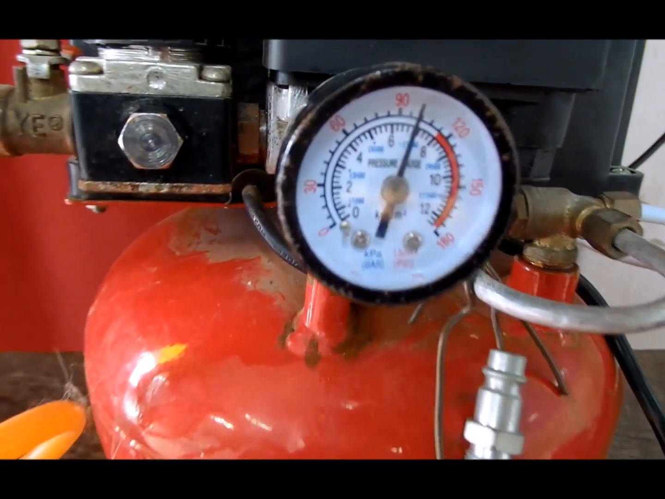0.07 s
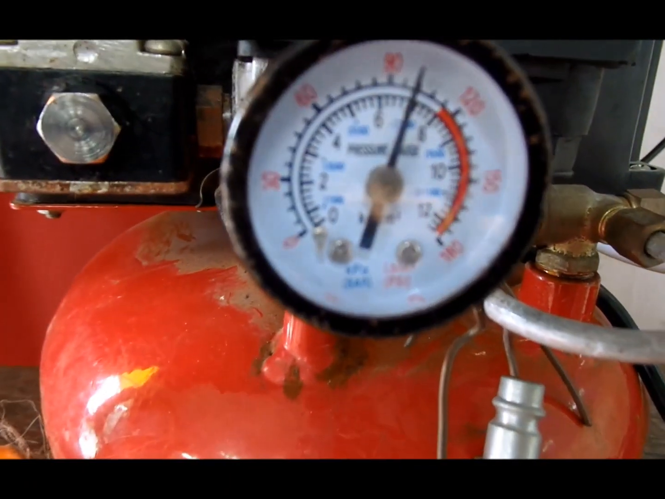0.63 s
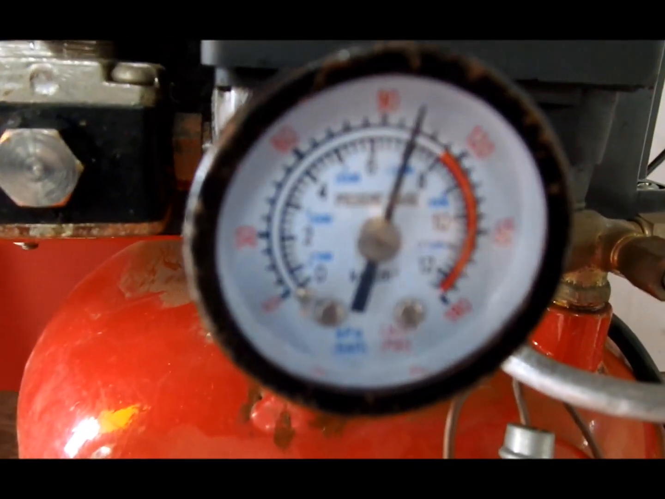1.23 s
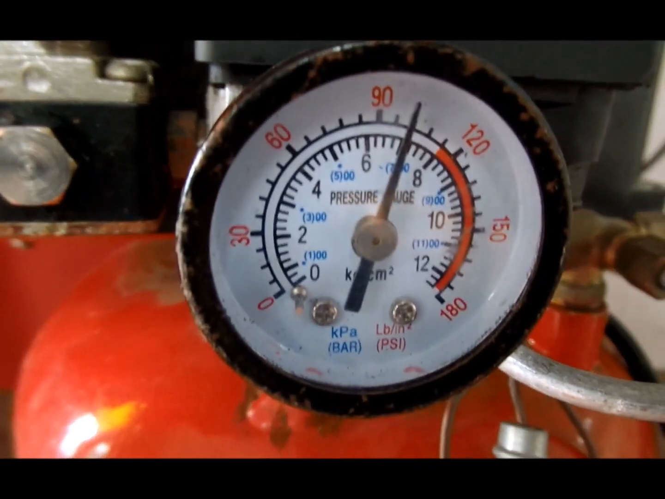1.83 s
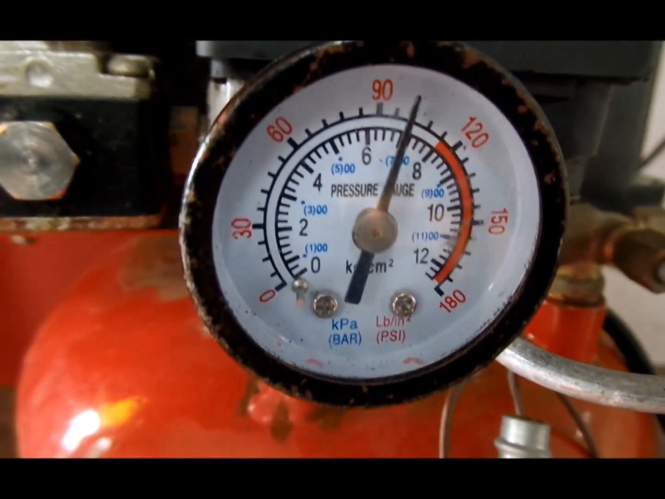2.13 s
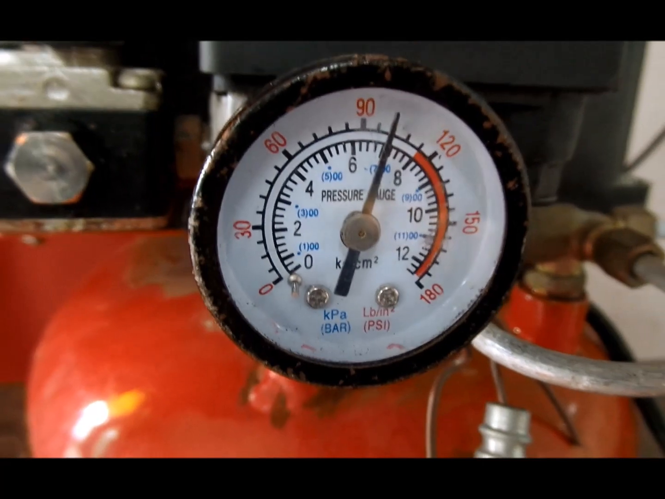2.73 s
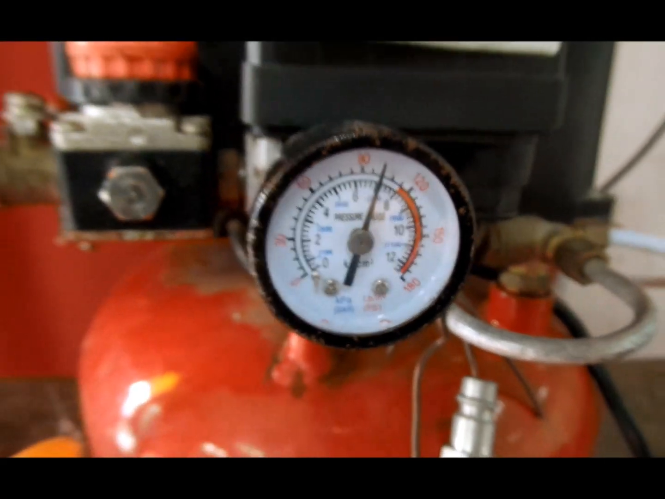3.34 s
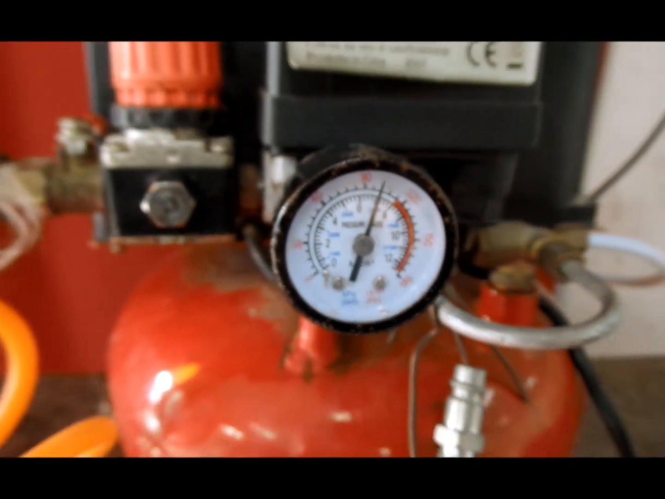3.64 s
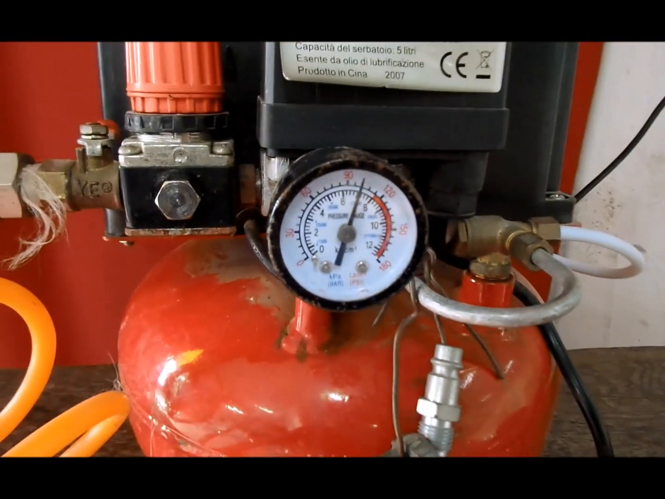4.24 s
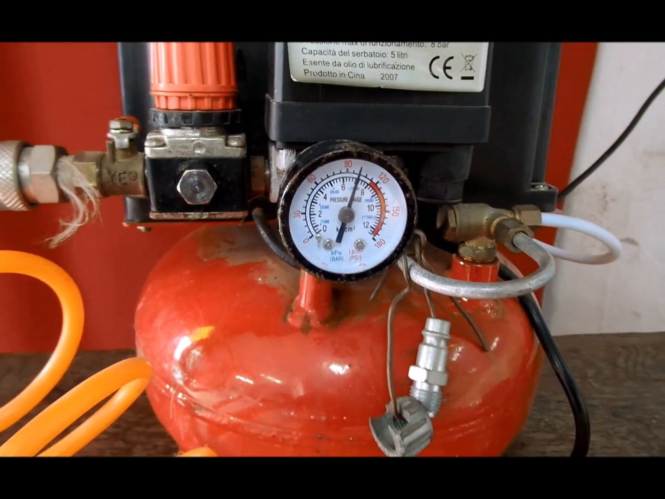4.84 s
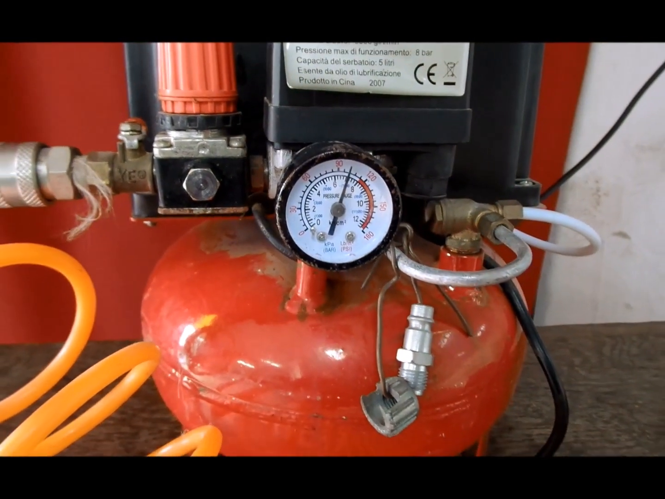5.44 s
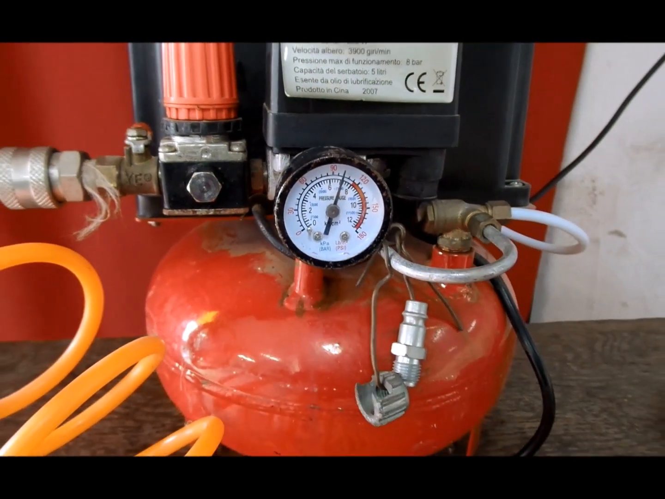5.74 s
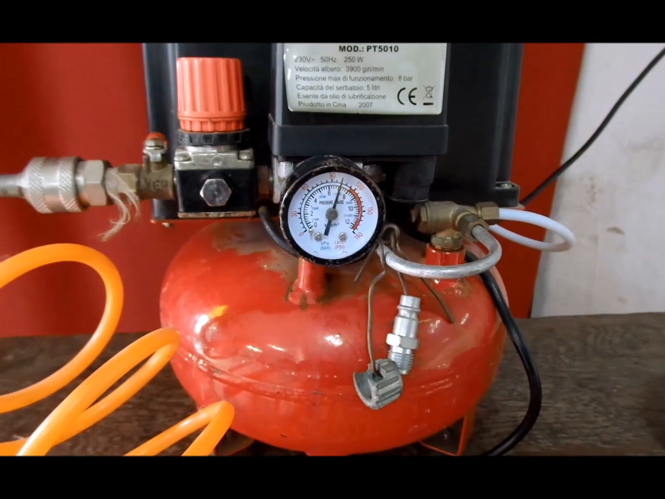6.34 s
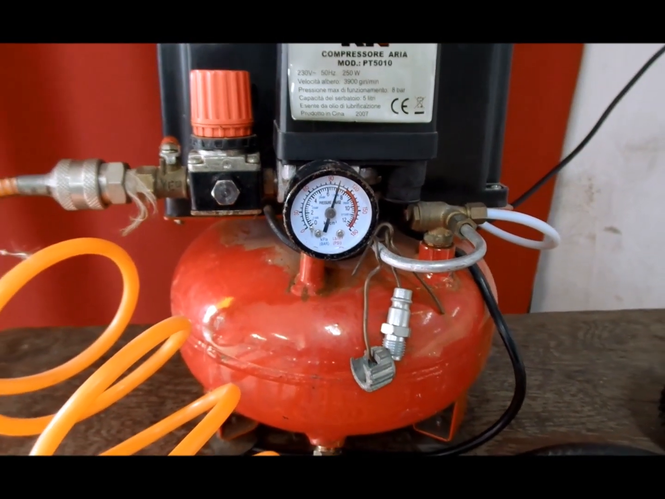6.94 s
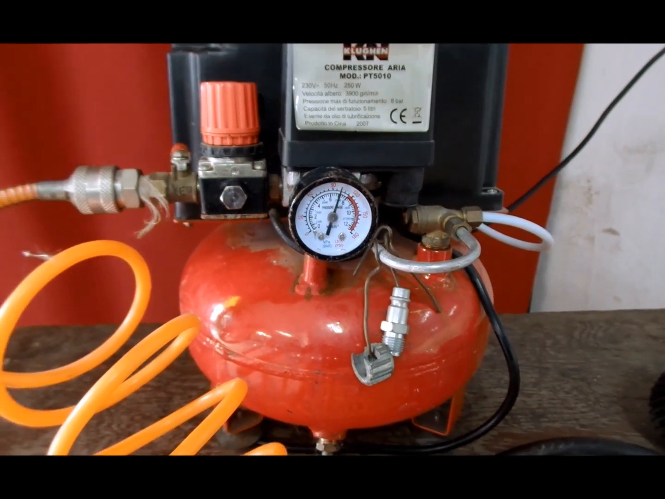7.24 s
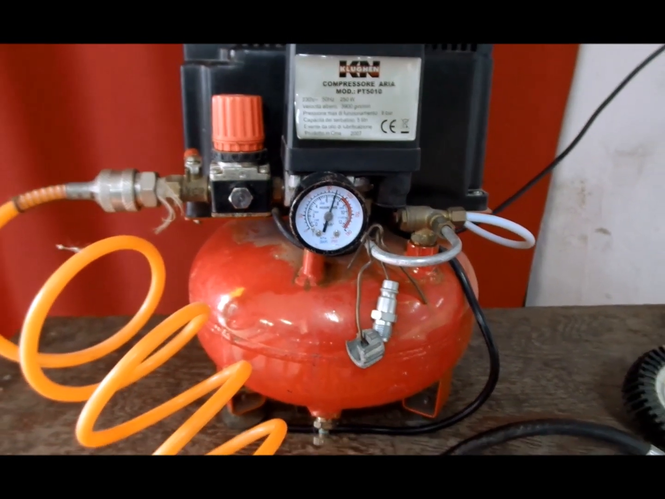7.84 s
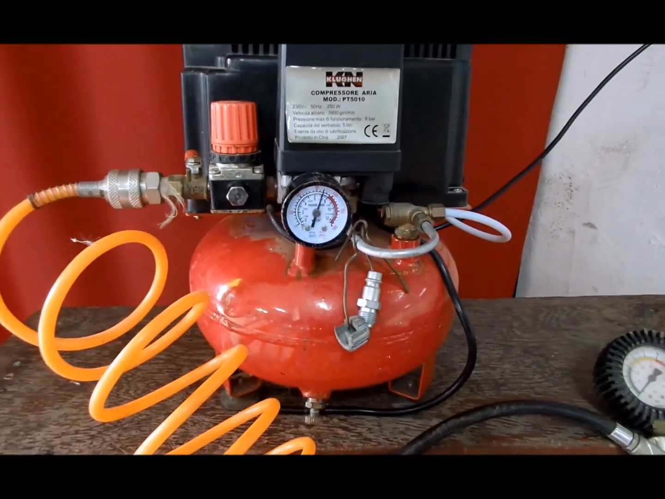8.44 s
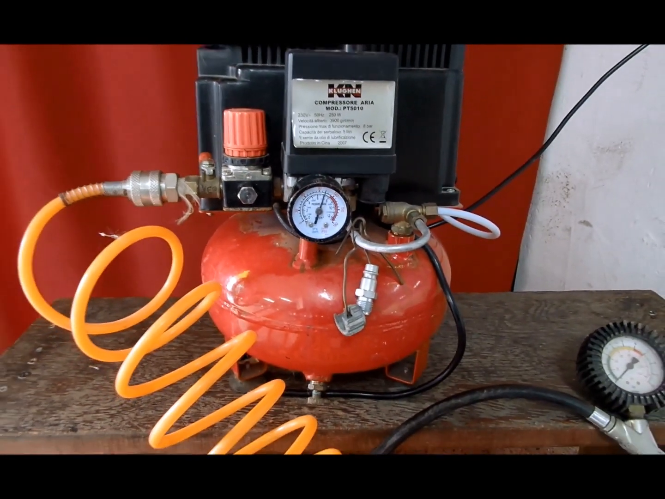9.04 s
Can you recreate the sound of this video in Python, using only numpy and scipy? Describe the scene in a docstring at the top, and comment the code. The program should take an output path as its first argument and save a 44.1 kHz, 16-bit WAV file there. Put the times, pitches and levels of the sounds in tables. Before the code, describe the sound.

A small piston air compressor runs without a break indoors. Its rapid hollow puffs blend into an even motor drone, with a light metallic clatter from the casing. Air rushes and hisses over it, along with a faint high whistle, tiny squeaks and the occasional tick of a loose fitting. The microphone starts close and backs away, so the sound softens a little.

```python
"""A small piston air compressor runs on a workbench indoors, slowing a little as its tank fills.
Each crank turn gives one hollow puff and rings the casing; the mains-fed motor hums and ripples the speed.
Cooling air rushes, the head hisses, the piston seal whistles and squeaks, and a loose fitting ticks.
The microphone starts at the gauge and backs away."""
import sys
import numpy as np
from scipy import signal
from scipy.fft import rfft, irfft
from scipy.io import wavfile
from scipy.ndimage import uniform_filter1d, map_coordinates

SR = 44100
rng = np.random.default_rng(int(sys.argv[2]) if len(sys.argv) > 2 else 0)


def master(y):
    """Save y as 16-bit WAV."""
    cut = np.clip(np.atleast_2d(y).T, -1, 1)
    pcm = np.round(cut * 32767)  # scale
    wavfile.write(sys.argv[1], SR, pcm.astype(np.int16))


N = 405272
TIME = np.arange(N) / SR
CRANK_HZ, SAG_HZ_PER_S = 69.14, .045
MEAN_CRANK_HZ = CRANK_HZ - SAG_HZ_PER_S * TIME.mean()
WHISTLE_HZ = 12680


def amp(db):
    return 10 ** (np.asarray(db) / 20)


def unit_rms(x):
    return x / np.sqrt(np.mean(x ** 2) + 1e-20)


def wander(hz, size=4096):
    """Smooth random motion of rms 1, up to about hz."""
    f = np.fft.rfftfreq(size, TIME[-1] / size)
    slow = irfft(rfft(rng.standard_normal(size)) / (1 + (f / hz) ** 4))
    return unit_rms(np.interp(TIME, np.linspace(0, TIME[-1], size), slow))


# Microphone path: (time [s], distance [0 = near, at the gauge; 1 = far, a step back])
MIC_PATH = [(0, 0.1), (.9, 0.043), (2.5, -0.063), (4, 0.47), (5, 0.57), (6, 0.9), (8, 1.054), (9.19, 1.2)]
def mic_distance(t=TIME):
    return np.interp(t, *np.transpose(MIC_PATH))


def level_at(distance, near_db, far_db, midway_db=0):
    """Levels in dB (moments x frequencies); reflections count most midway."""
    d = distance[:, None]
    return near_db + d * (far_db - near_db) + np.maximum(4 * d * (1 - d), 0) * midway_db


def colour(x, rows, phase=np.zeros_like, size=4096):
    """Filters x along the microphone path by rows of (Hz, near dB, far dB, optional midway dB)."""
    row_hz, *columns = np.transpose(rows)
    overlap = size - size // 4
    hz, t, spectra = signal.stft(x, SR, nperseg=size, noverlap=overlap)
    levels_db = [np.interp(np.log(hz + 1), np.log(row_hz), c) for c in columns]
    gain = amp(level_at(mic_distance(t), *levels_db)) * np.exp(1j * phase(hz))
    return signal.istft(spectra * gain.T, SR, nperseg=size, noverlap=overlap)[1][:N]


def crank(ripple_hz, ripple_turns=.0012, jitter_turns=.0003, start_turns=-.51):
    """Crank angle in turns, slowing under load and shaken by mains torque; puffs fall on whole turns."""
    steady = np.cumsum(CRANK_HZ - SAG_HZ_PER_S * TIME) / SR + start_turns
    return steady + ripple_turns * np.sin(2 * np.pi * ripple_hz * TIME) + jitter_turns * wander(45)


def revolve(orders, turns, size=4096):
    """Plays slowly changing complex amplitudes (moments x crank orders) at the crank angle."""
    cycles = irfft(np.pad(orders, ((0, 0), (1, 0))), size) * size / np.sqrt(2)
    moment = np.linspace(0, len(cycles) - 1, N)
    return map_coordinates(cycles, [moment, turns % 1 * size], order=1, mode="grid-wrap")


PUFF_ORDERS = 13
# Pump spectrum: (frequency [crank orders], near [dB], far [dB], midway reflections [dB])
PUMP_SPECTRUM = [(1, -50, -51.5, 0.0), (2, -50, -55.5, 0.5), (3.04, -44.5, -47, -1), (4, -48.5, -52.0, 0),
                 (5.1, -45, -49.5, 0), (6.05, -36, -36, -0.5), (7.11, -23, -27.5, 1.5),
                 (8.04, -22, -24.5, -2), (9.05, -21.5, -29.5, 1.5), (10.02, -26.5, -29, -2.5),
                 (10.92, -38, -46, 1), (11.8, -33.5, -42, 1), (12.84, -40, -45.5, -1.5),
                 (13.6, -50, -52, 4), (15, -51.5, -50.5, -10.5), (16, -42.5, -47, 0), (17, -39.5, -41, 1.5),
                 (18, -40.5, -64, 4.5), (19, -55.5, -50, 9), (20, -43, -53, -5), (21, -43, -45, -0.5),
                 (22, -41.5, -59, 2.5), (23, -50, -53, 5.5), (24, -46, -55.5, 2.5), (25, -49.5, -64, 6),
                 (26, -65, -61, -12)]
def pump(turns, sweep_turns_per_order=.026, unevenness=.006):
    """One pulse a turn passes the hollow intake and leaves as a puff of rising pitch."""
    pulses = revolve(np.ones((2, PUFF_ORDERS)), turns) * (1 + unevenness * wander(35))
    intake = np.array(PUMP_SPECTRUM) * [MEAN_CRANK_HZ, 1, 1, 1]
    peak_hz = intake[np.argmax(intake[:, 1]), 0]
    return colour(pulses, intake,
                  phase=lambda hz: 1 - np.pi * sweep_turns_per_order * ((hz - peak_hz) / MEAN_CRANK_HZ) ** 2)


# Casing modes: (frequency [Hz], width [Hz], near [dB], far [dB], midway reflections [dB],
# knock angle after the puff [turns])
CASING_MODES = [(1770, 75, -42, -66, 6, 0.057), (2011, 54, -46.5, -50, -6.5, 0.0485),
                (2150, 130, -52, -67, 0, 0.0716), (2488, 115, -48.5, -54, -1.5, 0.0783),
                (2890, 94, -54, -58.5, -0.5, .55), (3203, 85, -51, -55.5, 3, .58),
                (3635, 276, -55, -58.5, 1, .6), (4520, 680, -65.5, -66, 0, .1),
                (5185, 400, -63.5, -67, 0, .15), (5800, 100, -56.5, -61, 2.5, .07),
                (6650, 1400, -65, -67.5, 2.5, .19)]
def clatter(turns, casing_gain_db=.2, standing_db=2, smear_rad=.98, unevenness=.065, count=112):
    """Valves and bearings knock the casing at set crank angles; reflections shift the ring."""
    order = np.arange(1, count + 1)
    valve_orders = len(PUMP_SPECTRUM)
    mode_hz, width_hz, near_db, far_db, midway_db, mode_turns = np.transpose(CASING_MODES)
    detuning = (order * MEAN_CRANK_HZ - mode_hz[:, None]) / width_hz[:, None]
    response = 1 / (1 + 2 * detuning ** 2) ** 2
    loudest_mode = np.argmax(amp(near_db)[:, None] ** 2 * response, axis=0)
    knock_turns = mode_turns[loudest_mode]
    distance = mic_distance(np.linspace(0, TIME[-1], N // 4096))
    node, spacing = rng.random((count, 2)).T
    standing_wave = np.sin(2 * np.pi * (node + np.outer(distance, .5 + spacing)))
    standing_wave *= np.minimum(order / valve_orders, 2)
    ring_db = 10 * np.log10(amp([near_db, far_db]) ** 2 @ response)
    levels_db = level_at(distance, *ring_db, midway_db[loudest_mode])
    levels_db += casing_gain_db + standing_db * standing_wave
    # The pump's upper orders: the intake valve knocks between puffs.
    levels_db[:, :valve_orders] = level_at(distance, *np.transpose(PUMP_SPECTRUM)[1:])
    knock_turns[:valve_orders] = .6
    # Ringing metal smears each knock over much of the turn.
    phase = smear_rad * rng.standard_normal(count) + .5 * standing_wave - 2 * np.pi * order * knock_turns
    knocks = revolve(amp(levels_db) * np.exp(1j * phase) * (order > PUFF_ORDERS), turns)
    return knocks * (1 + unevenness * wander(87))


# Motor hum at the ripple frequency plus 0, 1, 2 crank orders: (level [dB])
HUM_LINES_DB = [-67.5, -68, -72]
def hum(turns, ripple_hz):
    """The motor's iron buzzes at twice the mains frequency, loaded by each stroke."""
    return np.sqrt(2) * sum(amp(db) * np.sin(2 * np.pi * (ripple_hz * TIME + order * turns))
                            for order, db in enumerate(HUM_LINES_DB))


# Cooling air spectrum: (frequency [Hz], near [dB/Hz], far [dB/Hz])
RUSH_SPECTRUM = [(20, -92, -88), (80, -77.5, -87), (332, -80.5, -82.5), (477, -70.5, -72),
                 (563, -65.5, -68), (785, -70.5, -75), (1040, -73.5, -78.5), (1220, -70, -71.5),
                 (1500, -73, -78), (1920, -76.5, -82.5), (2080, -74, -78.5), (2700, -76, -81.5),
                 (3220, -76.5, -79), (3850, -79.5, -83)]
# Head hiss shape: (frequency [Hz], near [relative dB], far [relative dB])
HISS_SHAPE = [(4660, -74.5, -85), (5800, -77.5, -80), (7000, -75, -82.5), (8070, -79.5, -82.5),
              (8300, -72, -78.5), (8500, -82.5, -86), (10000, -81.5, -85), (11000, -82.5, -86.5),
              (11400, -79.5, -81), (13100, -76.5, -82), (14000, -75, -79.5), (14200, -67, -76),
              (15200, -75.5, -77.5)]
def turbulence():
    """Air noise coloured by distance, split into a rush band and a hiss band."""
    noise = colour(rng.standard_normal(N) * np.sqrt(SR / 2), RUSH_SPECTRUM + HISS_SHAPE)
    split_hz = RUSH_SPECTRUM[-1][0]
    low = irfft(rfft(noise) * (np.fft.rfftfreq(N, 1 / SR) < split_hz), N)
    return low, noise - low


def rush(noise, turns, stroke_db=.5, flutter_db=1.23, gain_db=-.1):
    """Cooling air flutters and swells with every stroke."""
    return noise * amp(gain_db + stroke_db * np.cos(2 * np.pi * turns) + flutter_db * wander(25))


# Spells of extra seal leakage: (centre [s], half length [s], hiss rise [dB])
LEAK_SPELLS = [(2.1, 1, 0.7), (3.35, .02, 3), (8.6, 0.96, 1.4)]
def leak_db():
    """Extra flow past the seal swells and fades smoothly."""
    return sum(db * np.exp(-((TIME - centre_s) / half_s) ** 2) for centre_s, half_s, db in LEAK_SPELLS)


def hiss(noise, turns, near_db=-38, recede_db=-1.5, stroke_db=-.2, flutter_db=.96,
         valve_db=3.2, valve_at_turns=.091, valve_width_turns=.041):
    """The head's hiss flutters, and spits as the valve closes just after the puff."""
    steady = noise / np.sqrt(uniform_filter1d(noise ** 2, size=16384))
    from_valve_turns = (turns - valve_at_turns + .5) % 1 - .5
    spit = np.exp(-(from_valve_turns / valve_width_turns) ** 2)
    cycle_db = stroke_db * np.cos(2 * np.pi * turns) + valve_db * spit
    level_db = near_db + recede_db * mic_distance() + leak_db()
    return steady * amp(level_db + cycle_db + flutter_db * wander(45))


def whistle(level_db, width_hz=70, flicker_db=.5):
    """Leaking air excites a narrow resonance at the piston seal."""
    detuning = (np.fft.rfftfreq(N, 1 / SR) - WHISTLE_HZ) / width_hz
    airy = unit_rms(irfft(rfft(rng.standard_normal(N)) / (1 + 2 * detuning ** 2), N))
    return airy * amp(level_db + flicker_db * wander(27))


def random_events(per_s, level_db, spread_db=5.5):
    """Rows of (time [s], level [dB]) at random moments, scattered about a moving level."""
    onsets = np.flatnonzero(rng.random(N) < per_s / SR)
    scattered_db = level_db + spread_db * rng.uniform(-.75, 1, N)
    return [(i / SR, scattered_db[i]) for i in onsets]


def bursts(events, rise_s, decay_s):
    """Envelope that jumps and dies away at each (time [s], level [dB])."""
    onset_s, level_db = np.transpose(events)
    impulses = np.bincount((onset_s * SR).astype(int), amp(level_db), N)
    t = np.arange(SR // 5) / SR
    shape = (1 - np.exp(-t / rise_s)) * np.exp(-t / decay_s)
    return signal.oaconvolve(impulses, shape / shape.max())[:N]


# Clearest seal squeaks: (time [s], level [relative dB])
SEAL_SQUEAKS = [(.1594, -41), (1.5933, -40), (1.7684, -35.5), (7.4979, -41), (8.3409, -37), (8.8064, -35),
                (8.9092, -40)]
def squeaks(whistle_db, random_rise_db=10, gain_db=-3.5):
    """The seal catches now and then in a clean tone at the whistle's pitch."""
    events = SEAL_SQUEAKS + random_events(per_s=3.5, level_db=whistle_db + random_rise_db)
    envelope = bursts(events, rise_s=.005, decay_s=.022)
    return amp(gain_db) * envelope * np.sin(2 * np.pi * WHISTLE_HZ * TIME + wander(40))


def seal(turns, near_db=-53, recede_db=-4.5, db_per_leak_db=3.1, stroke_db=3):
    """Whistle and squeaks pulse with the stroke; leakage lifts the whistle."""
    level_db = near_db + recede_db * mic_distance() + db_per_leak_db * leak_db()
    return (whistle(level_db) + squeaks(level_db)) * amp(stroke_db * np.cos(2 * np.pi * turns))


# Clearest fitting ticks: (time [s], level [dB])
FITTING_TICKS = [(1.5694, -34), (1.5994, -34), (1.9594, -31), (2.4394, -36), (3.3822, -36)]
def ticks(band_hz=(2800, 6000), faint_db=-42, recede_db=-5):
    """A loose fitting, shaken by the pump, taps with a short bright rasp."""
    events = FITTING_TICKS + random_events(per_s=2.5, level_db=faint_db + recede_db * mic_distance())
    bandpass = signal.butter(2, band_hz, "band", fs=SR, output="sos")
    rasp = unit_rms(signal.sosfilt(bandpass, rng.standard_normal(N)))
    return rasp * bursts(events, rise_s=.00088, decay_s=.0047)


def scene(ripple_hz=100, opening_s=.292, opening_db=2.5):
    """One crank drives the compressor; the opening moment is a little louder."""
    turns = crank(ripple_hz)
    rush_band, hiss_band = turbulence()
    machine = pump(turns) + clatter(turns) + hum(turns, ripple_hz)
    air = rush(rush_band, turns) + hiss(hiss_band, turns) + seal(turns)
    opening_gain = amp(opening_db * np.clip((opening_s - TIME) / .01, 0, 1))
    return (opening_gain * (machine + air + ticks()))[None]


def record(dry, cutoff_hz=15790):
    """Steep low-pass."""
    lowpass = signal.firwin(1023, cutoff_hz, window=("kaiser", 9), fs=SR)
    return signal.oaconvolve(dry, lowpass[None], "same")


dry = scene()
out = record(dry)
master(out)
```